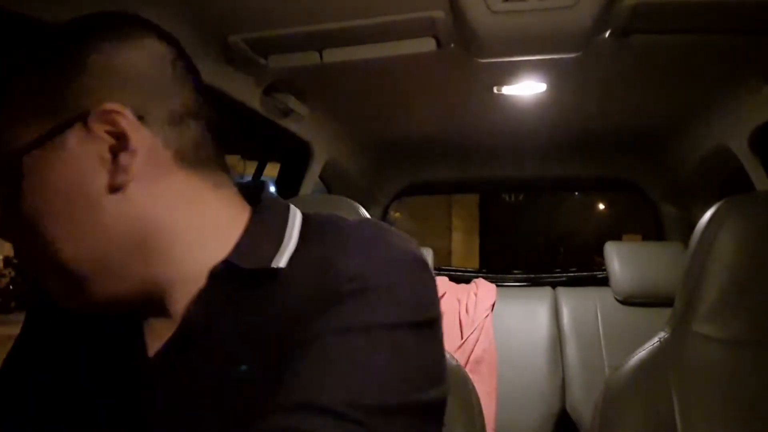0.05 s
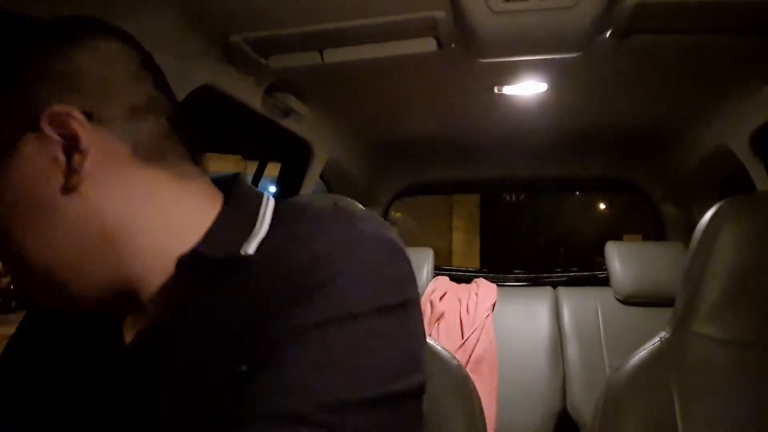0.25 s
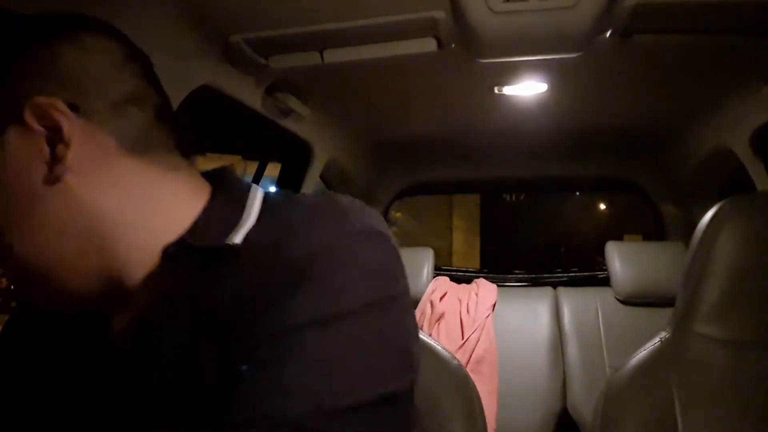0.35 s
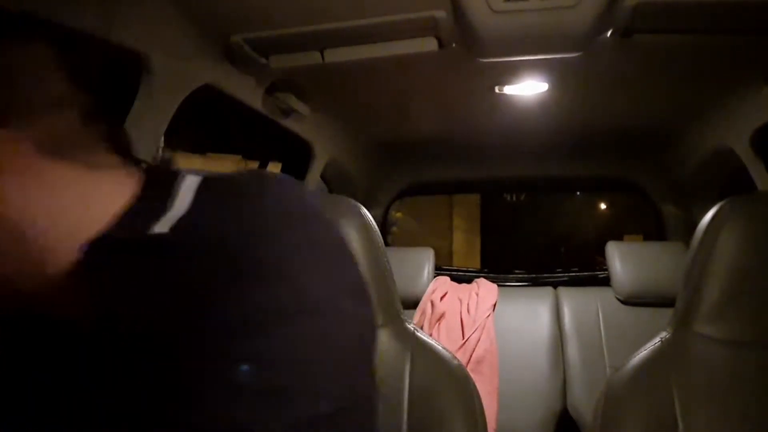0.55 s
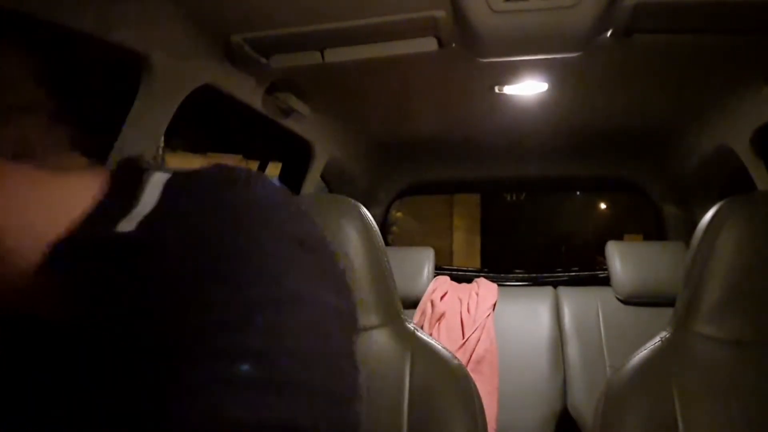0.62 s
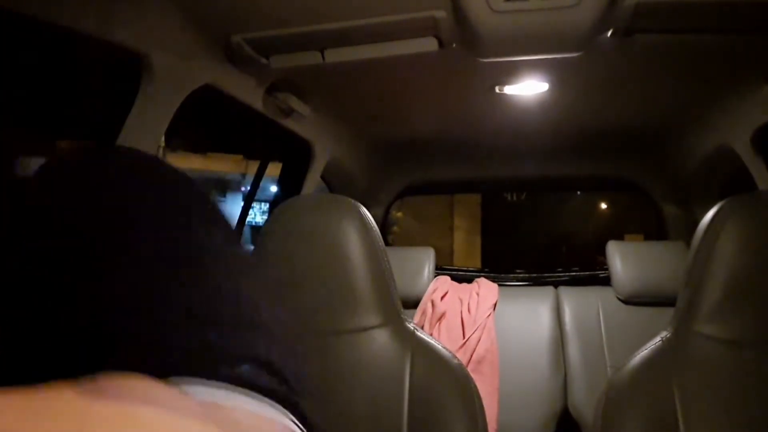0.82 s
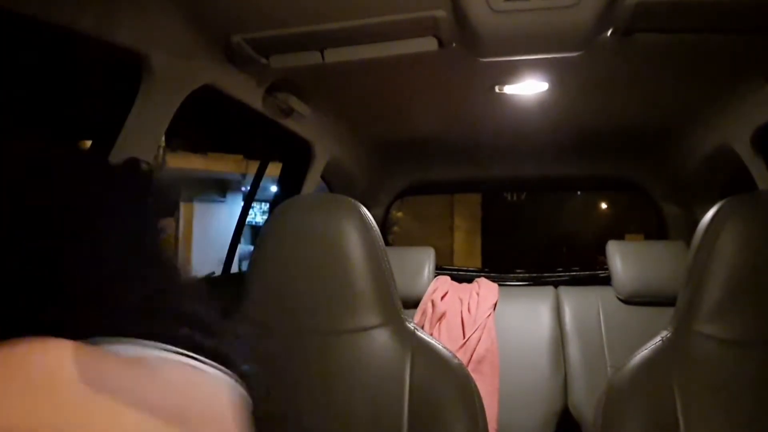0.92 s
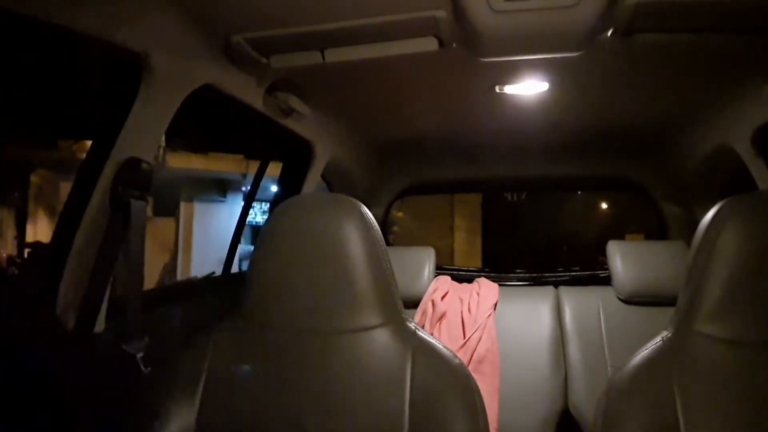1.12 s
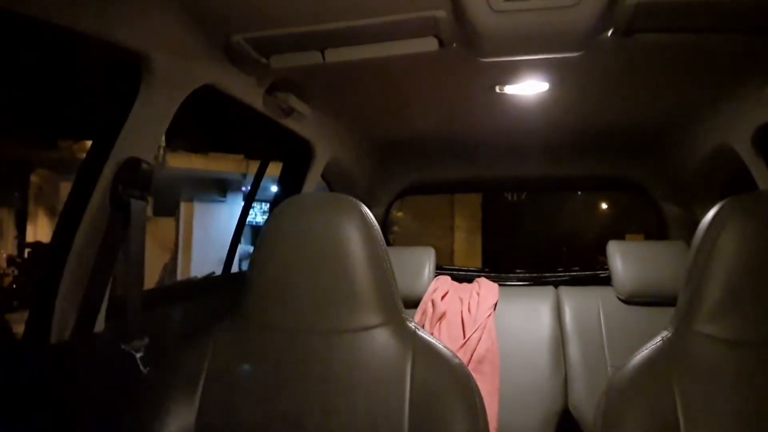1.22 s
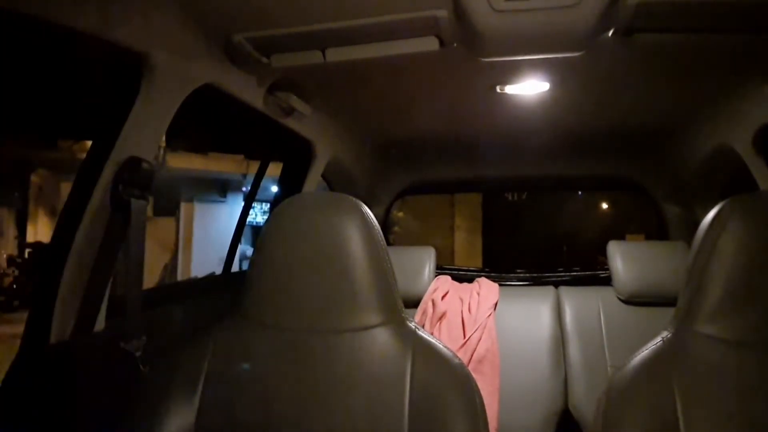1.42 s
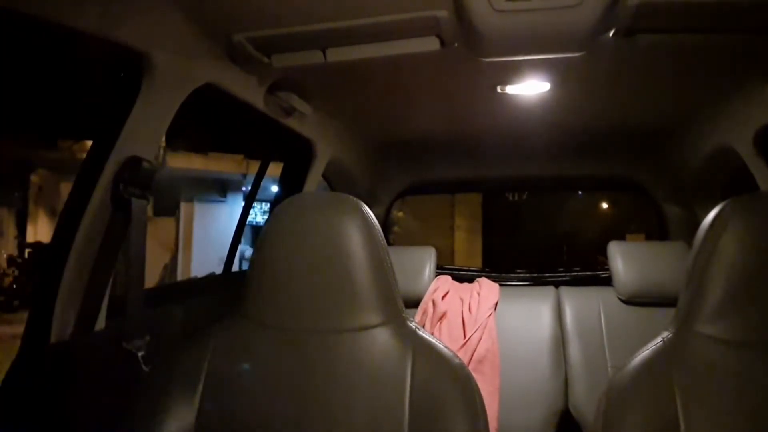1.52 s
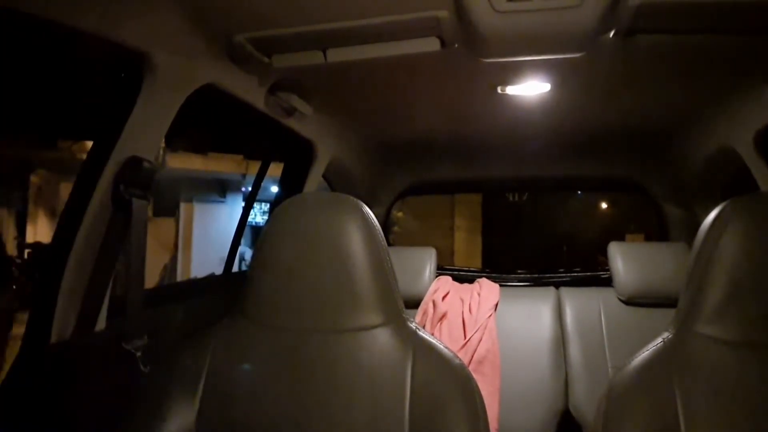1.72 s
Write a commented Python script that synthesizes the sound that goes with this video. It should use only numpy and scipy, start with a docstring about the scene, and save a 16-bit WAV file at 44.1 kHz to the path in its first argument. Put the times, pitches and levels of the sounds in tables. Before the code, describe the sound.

A person shifts off a car seat, heard close in a dry cabin. The upholstery squeaks faintly for the first half second, with a heavy, low thump at 0.3 seconds. Clothes then swish softly until about 1.7 seconds, amid smaller thuds mostly on the left. Limbs knock against creaking trim near 0.5, 0.7 and 1.3 seconds. The engine idles low throughout.

```python
"""Clothes swish over upholstery as someone twists round and slides off the front seat of a parked car.
The upholstery squeaks thinly at first; the seat takes the weight with a heavy thump, and limbs bump
the trim and set panels creaking. The shifting weight gives low thuds, most near the left microphone.
Heard close, from a stereo pair on the dashboard of the small dead cabin, with the engine idling low."""
import sys
import numpy as np
from scipy import signal
from scipy.io import wavfile

SR = 44100
rng = np.random.default_rng(int(sys.argv[2]) if len(sys.argv) > 2 else 0)


def transcribe(signal):
    """Save signal, clipped to [-1, 1], as a 16-bit WAV file at the path in sys.argv[1]."""
    frames = np.atleast_2d(signal).T
    limited = np.clip(frames, -1, 1)
    pcm = np.round(limited * 32767).astype(np.int16)
    wavfile.write(sys.argv[1], SR, pcm)


N = 77175
T = np.arange(N) / SR


def from_db(db):
    """Decibels to gain."""
    return 10 ** (np.asarray(db) / 20)


def unit_rms(x):
    """Scale to rms 1."""
    return x / np.sqrt(np.mean(x ** 2) + 1e-20)


def pan(pan_db):
    """Gains at the two microphones; pan_db is left minus right."""
    return from_db(np.array([[pan_db], [-pan_db]]) / 2)


def at_hz(table, hz):
    """Read a table on a log-frequency axis."""
    table_hz, values = np.array(table).T
    return np.interp(np.log(hz), np.log(table_hz), values)


def drift(rate_hz):
    """Smooth random wander, rms 1."""
    pole = np.exp(-2 * np.pi * rate_hz / SR)
    wander = signal.lfilter([1], [1, -2 * pole, pole * pole], rng.standard_normal(2 * N))
    return unit_rms(wander[N:])


def envelope(start, end, rise, fall):
    """Smooth rise, hold until the end, then a fall of 20 dB per fall time."""
    up = np.sin(np.pi / 2 * np.clip((T - start) / rise, 0, 1)) ** 2
    return up * from_db(-20 * np.clip((T - end) / fall, 0, 10))


# How alike the two microphones hear the cabin: frequency_hz, correlation
MIC_LIKENESS = [(50, 0.27), (200, 1), (350, 0.59), (600, -0.15), (1200, -0.18), (3000, 0.066),
                (15000, -0.088)]
def stereo(mid, side, hz):
    """Left and right, as alike as the two microphones are at this pitch."""
    alike = np.clip(at_hz(MIC_LIKENESS, hz), -1, 1)
    return np.sqrt(1 + alike) * mid + np.sqrt(1 - alike) * side * [[1], [-1]]


def noise_bands(spectrum, patchy_db, grains_per_s=0, grain_share=0):
    """Centres and half-octave bands of stereo noise and tiny clicks, rms 1 in sum."""
    edges = 22 * 2 ** np.arange(0, 9.6, .5)
    centres = np.sqrt(edges[1:] * edges[:-1])
    shape = (2, 2, N)  # alternate bands draw on separate mid and side pairs
    clicks = unit_rms(rng.standard_normal(shape) * (rng.random(shape) < grains_per_s / SR))
    white = np.sqrt(1 - grain_share) * rng.standard_normal(shape) + np.sqrt(grain_share) * clicks
    bands = []
    for k, hz in enumerate(centres):
        bandpass = signal.butter(2, edges[k:k + 2], "band", fs=SR, output="sos")
        mid, side = signal.sosfilt(bandpass, white[k % 2])
        gain = from_db(at_hz(spectrum, hz) + patchy_db * drift(21.6))
        bands.append(gain * stereo(mid, side, hz))
    return centres, np.array(bands) / np.std(sum(bands))


def tilted(centres, bands, db_per_octave):
    """Sum the bands, tilted brighter or duller; rms 1."""
    gains = from_db(db_per_octave * np.log2(centres))
    return unit_rms(np.tensordot(gains, bands, 1))


def cabin_reflections(x, t60_s=.2):
    """Dense, quickly dying reflections, different at each microphone."""
    t = T[:N // 4]
    tails = rng.standard_normal((2, len(t))) * from_db(-60 * t / t60_s)
    tails /= np.sqrt(np.sum(tails ** 2) / 2)
    return signal.fftconvolve(x[None], tails, axes=1)[:, :N]


# Engine tones from inside the car: pitch_hz, level_db
ENGINE_TONES = [(49.5, -39), (99, -47.5), (220, -55)]
# Rumble and hiss all round the microphones: frequency_hz, relative_density_db
CABIN_SPECTRUM = [(25, -35.5), (36, -26), (50, -2), (85, 0.5), (140, -13), (210, -13.5), (300, -19),
                  (450, -28), (800, -33), (1500, -39.5), (3000, -44), (7000, -50), (15500, -52)]
def engine_idle(waver_db=1.2, wander_rad=.25, rumble_db=-39):
    """A wavering engine hum, stronger on the left, over the cabin's rumble and hiss."""
    hum = 0
    for hz, level_db in ENGINE_TONES:
        peak = np.sqrt(2) * from_db(level_db + waver_db * drift(15))
        hum += peak * np.sin(2 * np.pi * hz * T + wander_rad * drift(2))
    _, bands = noise_bands(CABIN_SPECTRUM, patchy_db=1.5)
    return pan(7) * hum + from_db(rumble_db) * bands.sum(axis=0)


# Seat and trim panels, across both microphones: start_s, centre_hz, width_hz, level_db, fall_s
PANEL_CREAKS = [(.474, 3050, 805, -47, 0.018), (0.496, 303, 80, -44, .025),
                (0.518, 1113, 109, -51.5, 0.074), (0.557, 294, 48.5, -38.5, 0.14),
                (0.687, 870, 168, -40, 0.013), (0.756, 570, 39.6, -49, 0.037), (1.257, 780, 147, -44, .07),
                (1.61, 2540, 1000, -56.5, 0.062), (1.713, 2600, 1000, -54.5, 0.071)]
def panel_creaks(rise_s=.0031):
    """Friction briefly drives one panel resonance at a time."""
    out = 0
    for start, hz, width_hz, level_db, fall in PANEL_CREAKS:
        resonance = signal.butter(2, [hz - width_hz / 2, hz + width_hz / 2], "band", fs=SR, output="sos")
        mid, side = signal.sosfilt(resonance, rng.standard_normal((2, N)))
        shape = envelope(start, start + 2 * rise_s, rise_s, fall)
        creak = unit_rms(shape * stereo(mid, side, hz))
        out += from_db(level_db) * np.sqrt(np.mean(shape ** 2)) * creak
    return out


# The dull voice of the trim: frequency_hz, relative_density_db
TRIM_SPECTRUM = [(90, -9), (150, 2.5), (220, -2), (310, -6), (420, -14.5), (600, -20.5), (830, -37.5),
                 (1150, -44), (2000, -45.5), (4000, -64), (15000, -110)]
# Contacts around the seat: start_s, level_db, rise_s, fall_s, tilt_db_per_octave, pan_db
LIMB_BUMPS = [(.01, -27, 0.0053, 0.0085, -9.5, -2), (0.213, -38.5, 0.061, 0.14, 4, 1),
              (0.284, -40, 0.0076, .045, 3, -4), (0.494, -35.5, 0.0019, 0.075, 3, 6.5),
              (0.517, -37.5, .006, 0.023, 4.7, -1), (.545, -36.5, 0.016, 0.057, -.5, 2),
              (0.586, -45, .012, 0.11, 5.7, -4), (0.689, -27, 0.0046, 0.057, 3.5, 0.5),
              (0.752, -50, 0.016, 0.25, -2, 0), (1.25, -30, 0.026, 0.098, 4.5, 3.5),
              (1.364, -46.5, 0.0085, 0.067, 6.5, 5)]
def trim_bumps():
    """Limbs bump and scuff softly against hollow trim."""
    centres, bands = noise_bands(TRIM_SPECTRUM, patchy_db=.5, grains_per_s=500, grain_share=.34)
    out = 0
    for start, level_db, rise, fall, tilt, pan_db in LIMB_BUMPS:
        shape = envelope(start, start + rise, rise, fall)
        out += from_db(level_db) * pan(pan_db) * shape * tilted(centres, bands, tilt)
    return out


# Thuds and hollow knocks, most near the left microphone: start_s, level_db, pitch_hz, pan_db
WEIGHT_THUDS = [(0.071, -26, 85.5, 16), (.165, -30, 94.2, 10.5), (0.223, -20.5, 75.6, 12.5),
                (0.431, -19, 83.4, 8), (0.517, -24, 79.3, 10), (0.574, -26, 79.4, 6),
                (0.695, -25.5, 229.2, 3), (.699, -32, 110, -18), (.745, -23, 55.4, 6),
                (0.788, -21, 60.5, 6), (0.909, -30, 60, 16.5), (0.953, -28.5, 70.5, 18),
                (1.026, -30.5, 75, 18), (1.26, -22.5, 210.2, -2), (1.489, -31.5, 91.8, 25.5),
                (1.728, -34.5, 108.5, 34)]
def weight_thuds(rise_s=.0084, fall_s=.051):
    """Each shift of weight gives a few cycles of damped boom."""
    out = 0
    for start, level_db, hz, pan_db in WEIGHT_THUDS:
        shape = envelope(start, start + rise_s, rise_s, fall_s)
        out += from_db(level_db) * pan(pan_db) * shape * np.sin(2 * np.pi * hz * (T - start))
    return out


# The front seat takes the weight: start_s, level_db
SEAT_BLOWS = [(0.2859, -8), (0.3078, -18.5), (0.363, -22)]
# Seat and cabin modes at the dashboard: pitch_hz, gain_db, t60_s, pan_db
SEAT_MODES = [(82.1, 5.5, 0.21, -3.5), (120.3, -2.5, 0.19, 14), (189.8, -9.5, 0.1, 1.5),
              (219.9, -9, .15, 5), (334, -19.5, 0.13, 9), (371, -35.5, .08, 1)]
def seat_thumps(rise_s=.008):
    """Cushioned blows swell quickly into the low modes of the seat."""
    out = 0
    for start, level_db in SEAT_BLOWS:
        age = np.maximum(T - start, 0)
        swell = np.sin(np.pi / 2 * np.minimum(age / rise_s, 1)) ** 2
        for hz, gain_db, t60, pan_db in SEAT_MODES:
            ring = from_db(level_db + gain_db - 60 * age / t60) * np.cos(2 * np.pi * hz * age)
            out += pan(pan_db) * swell * ring
    return out


# Squeaks on the seat: start_s, length_s, first_hz, middle_hz, last_hz, level_db, roughness, pan_db
SEAT_SQUEAKS = [(.024, 0.021, 2960, 2860, 2900, -56.5, 0.37, 2),
                (0.055, .11, 2860, 2788, 2900, -64, 0.76, 3),
                (0.063, .06, 2620, 2363, 2560, -57.5, 0.3, -8),
                (0.127, 0.093, 2515, 2445, 2300, -62, 0.8, -1),
                (0.157, 0.096, 2976, 3010, 3056, -55, .2, 4.5),
                (0.203, 0.041, 2995, 3042, 2965, -55, 0.02, -3.5),
                (0.254, 0.049, 2980, 2977, 2905, -52.5, 0.15, 7.5),
                (0.286, 0.12, 3030, 3002, 3056, -58.5, .45, 6),
                (0.288, .09, 2938, 2710, 2343, -56, .5, -7.5), (.365, 0.1, 2296, 2150, 2310, -62.5, 1, -6),
                (.395, .065, 2780, 2656, 2600, -58.5, 0.86, -2)]
def upholstery_squeaks(pitch_jitter=.042, flutter_db=.5, reflections_db=3.5):
    """Stick and slip on the upholstery: thin gliding tones with unsteady pitch."""
    out = 0
    for start, length, first_hz, middle_hz, last_hz, level_db, roughness, pan_db in SEAT_SQUEAKS:
        progress = np.clip((T - start) / length, 0, 1)
        glide = np.polyfit([0, .5, 1], [first_hz, middle_hz, last_hz], 2)
        hz = np.polyval(glide, progress) * (1 + pitch_jitter * roughness * drift(250))
        arch = np.sqrt(np.abs(np.sin(np.pi * progress)))
        gain = arch * from_db(level_db + flutter_db * drift(60))
        tone = gain * np.sin(2 * np.pi * np.cumsum(hz) / SR)
        out += pan(pan_db) * (tone + from_db(reflections_db) * cabin_reflections(tone))
    return out


# Cloth rubbing at close range: frequency_hz, relative_density_db
CLOTH_SPECTRUM = [(250, -5.5), (600, 0), (1100, 2), (1700, 0), (2600, 1), (4500, -3), (7000, -5),
                  (8200, -11.5), (10500, -5), (15500, -9.5)]
# Slides across the front seat: start_s, end_s, rise_s, fall_s, level_db, tilt_db_per_octave, pan_db
CLOTH_SLIDES = [(.352, .368, .012, 0.069, -56.5, -0.5, 1.5), (0.399, 0.472, 0.03, 0.023, -58, -1, -1),
                (0.471, 0.648, .05, 0.11, -54.5, -1, 2), (0.695, 0.923, 0.024, 0.18, -57.5, -0.5, 1.5),
                (0.911, 1.032, 0.095, 0.27, -52.5, -2.5, 1), (.99, 1.056, .05, .04, -60, 15, -2),
                (1.054, 1.321, 0.18, 0.17, -54, -1.3, 2.5), (1.32, 1.424, 0.043, 0.2, -55, -2.5, 2.5),
                (1.66, 1.74, 0.069, 0.07, -49.5, -1.1, 0.5)]
# Folds flicking: peak_s, level_db, fall_s, tilt_db_per_octave, pan_db
FOLD_FLICKS = [(0.065, -62.5, 0.038, 6.5, -3), (.438, -65, 0.035, 3, 6), (0.476, -56, 0.017, 0, 5),
               (0.693, -44.5, 0.031, -1.5, 0), (0.811, -51, 0.06, -2.5, 0),
               (1.481, -57.5, 0.0067, -1.5, -14), (1.527, -57.5, 0.039, -0.5, 1), (1.611, -54, .02, -1, -3)]
def cloth_swishes(flick_rise_s=.004):
    """Fibres catch and slip: long swishes and short flicks of a fold."""
    flicks = [(peak - flick_rise_s, peak + flick_rise_s, flick_rise_s, fall, level_db, tilt, pan_db)
              for peak, level_db, fall, tilt, pan_db in FOLD_FLICKS]
    out = 0
    for strokes in (CLOTH_SLIDES, flicks):
        centres, bands = noise_bands(CLOTH_SPECTRUM, patchy_db=.8, grains_per_s=1700, grain_share=.13)
        for start, end, rise, fall, level_db, tilt, pan_db in strokes:
            shape = envelope(start, end, rise, fall)
            out += from_db(level_db) * pan(pan_db) * shape * tilted(centres, bands, tilt)
    return out


def scene():
    """Everything heard from the dashboard."""
    seat = cloth_swishes() + upholstery_squeaks() + seat_thumps() + weight_thuds()
    return seat + trim_bumps() + panel_creaks() + engine_idle()


def record(dry):
    """The microphones lose the deepest bass; the top is cut steeply."""
    low_cut = signal.butter(8, 29.2, "high", fs=SR, output="sos")
    high_cut = signal.ellip(10, .1, 80, 15800, fs=SR, output="sos")
    return signal.sosfilt(high_cut, signal.sosfilt(low_cut, dry))


dry = scene()
out = record(dry)
transcribe(out)
```